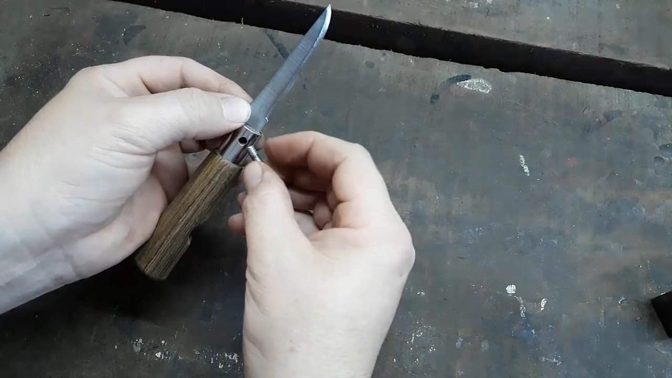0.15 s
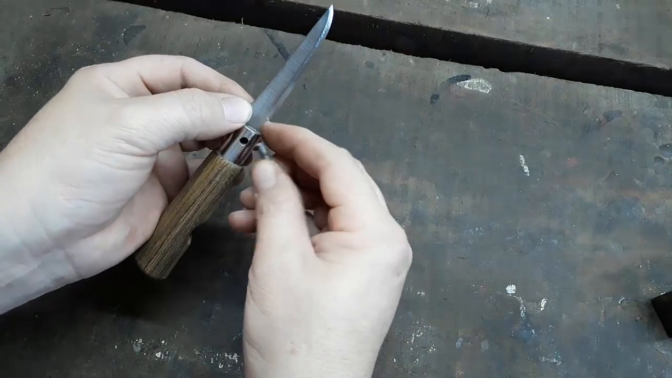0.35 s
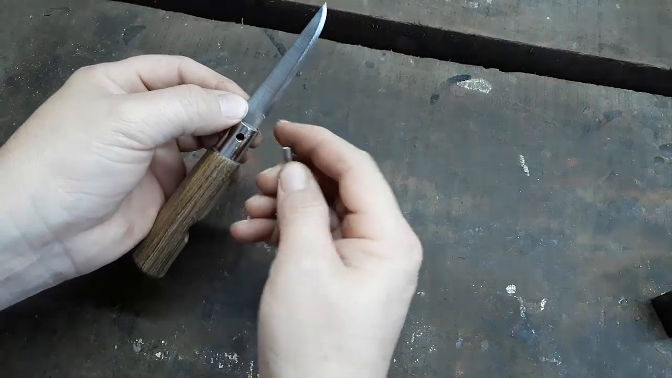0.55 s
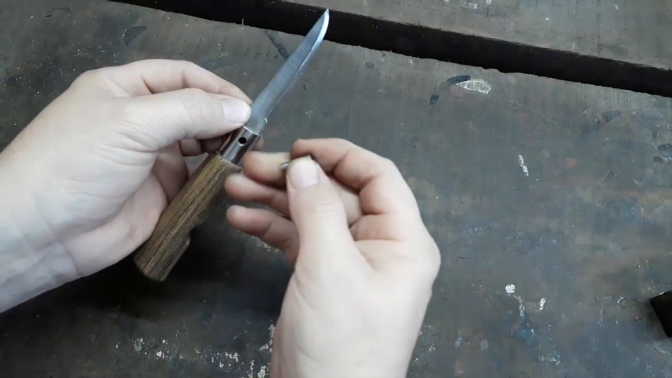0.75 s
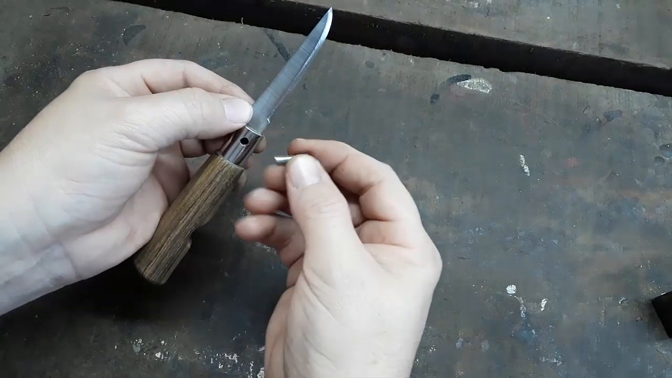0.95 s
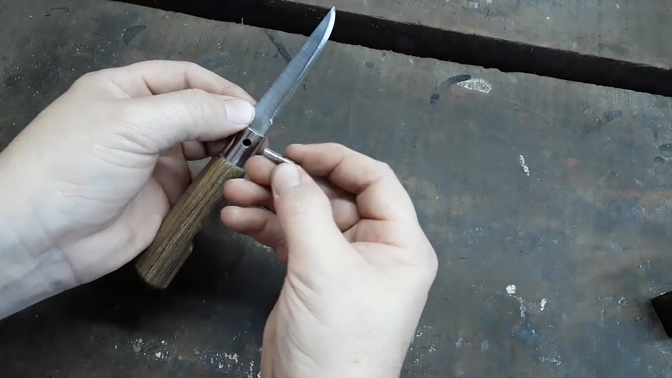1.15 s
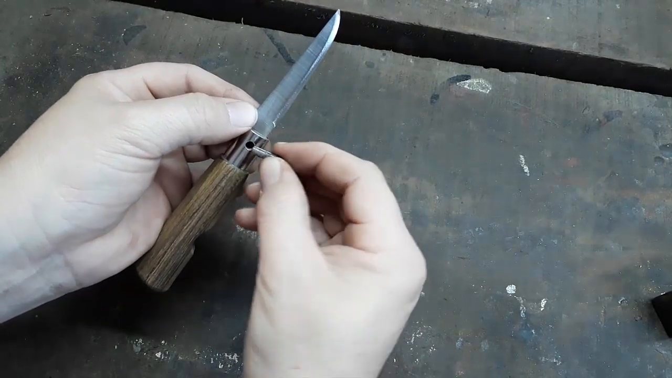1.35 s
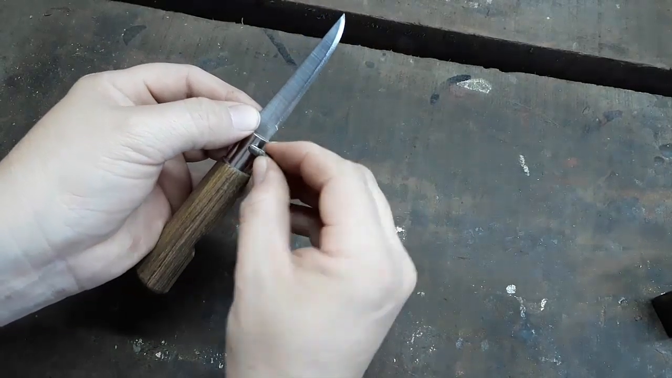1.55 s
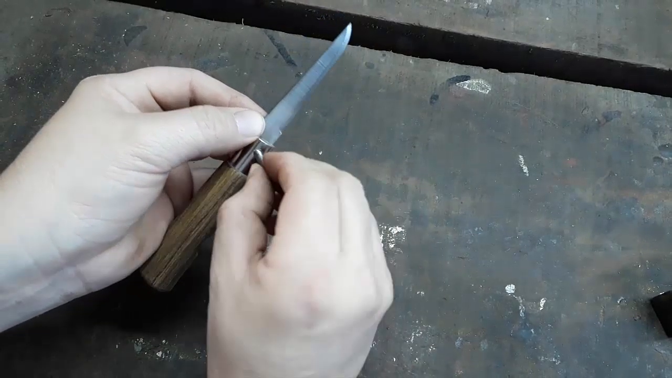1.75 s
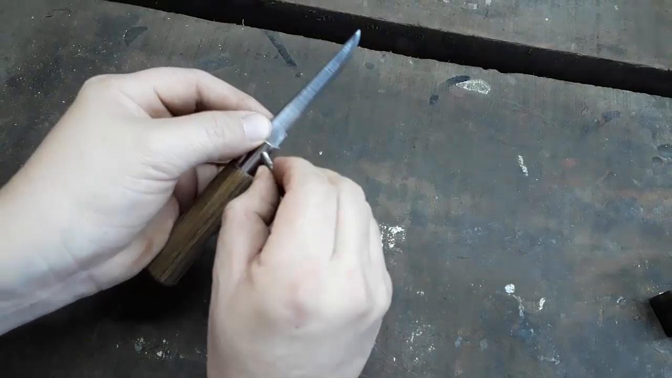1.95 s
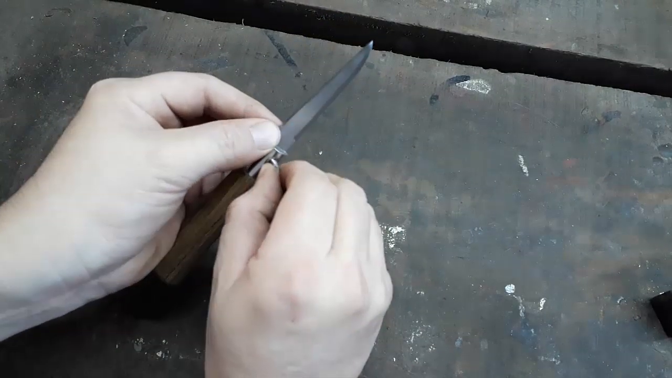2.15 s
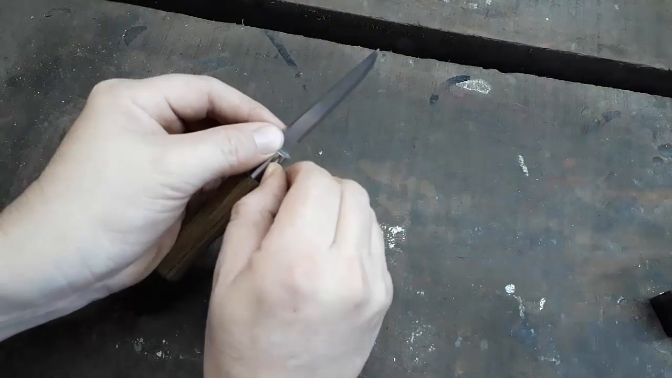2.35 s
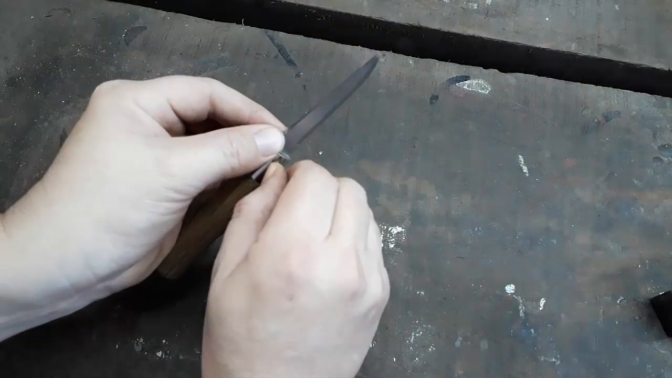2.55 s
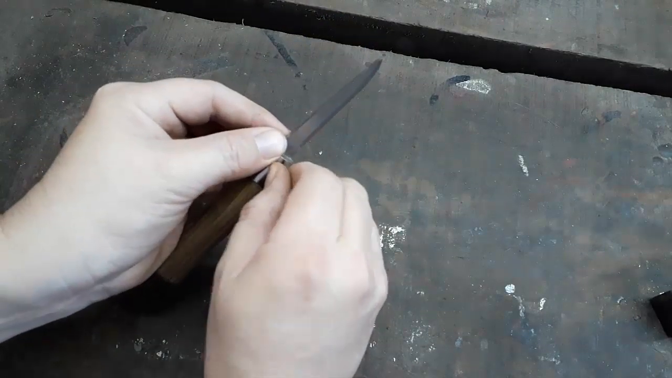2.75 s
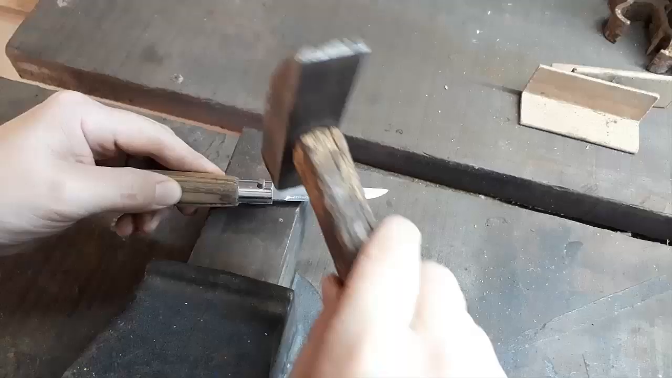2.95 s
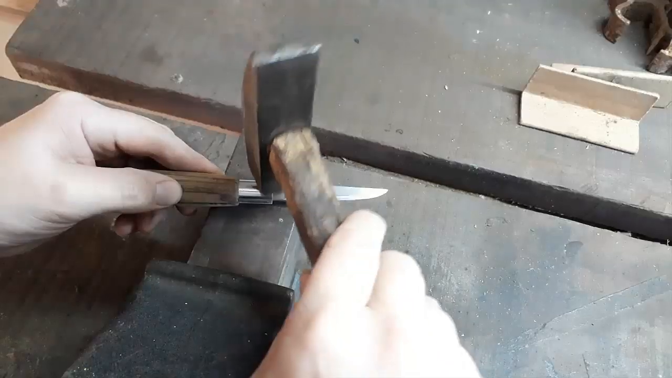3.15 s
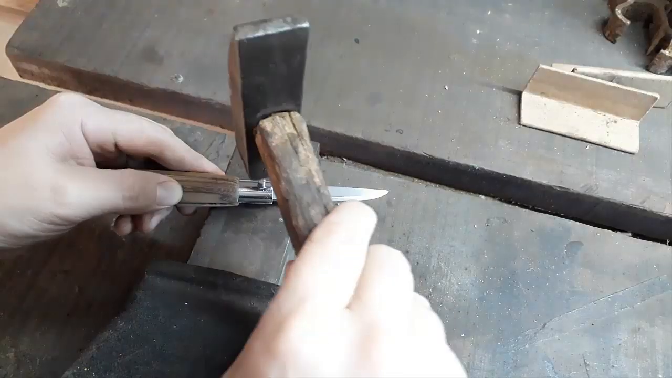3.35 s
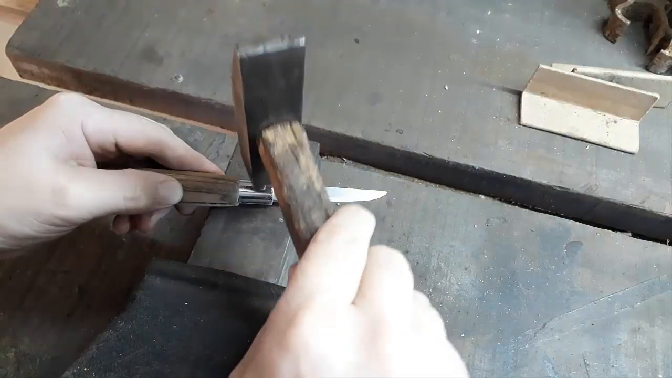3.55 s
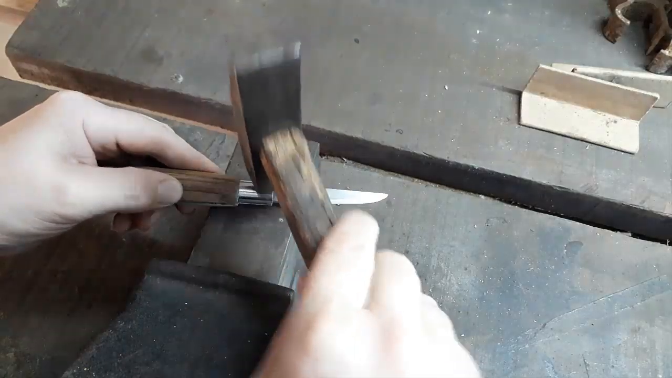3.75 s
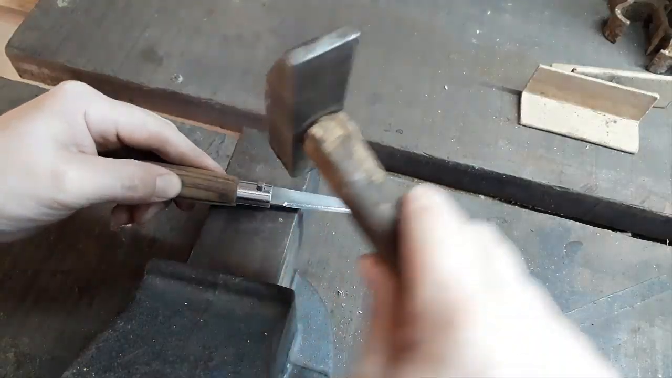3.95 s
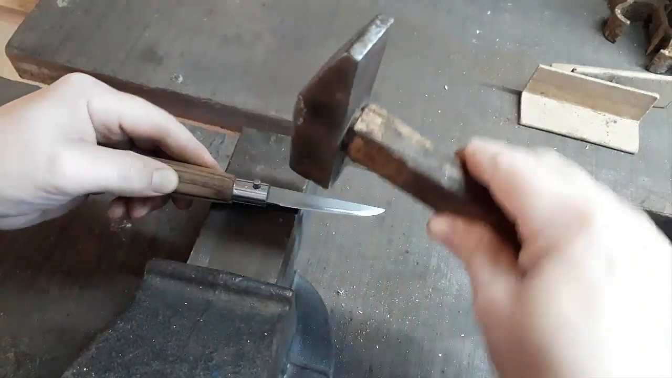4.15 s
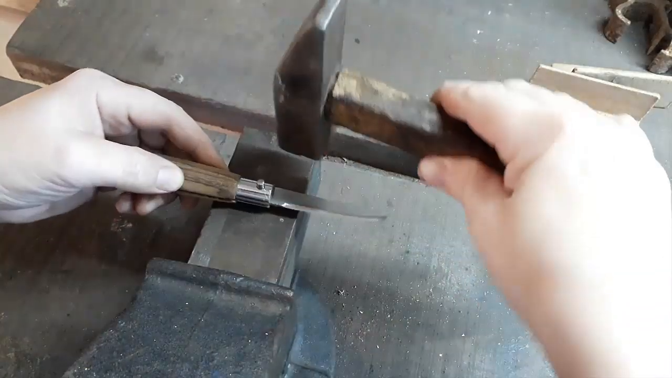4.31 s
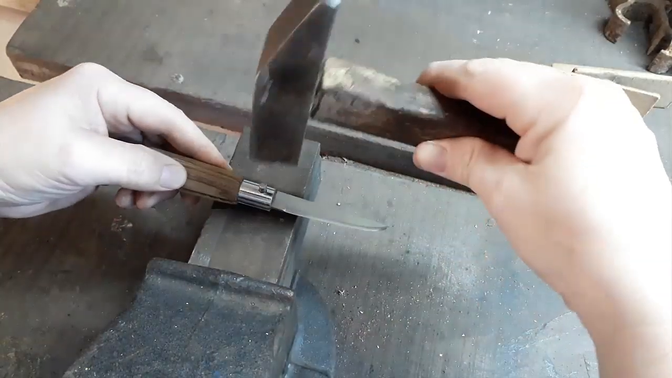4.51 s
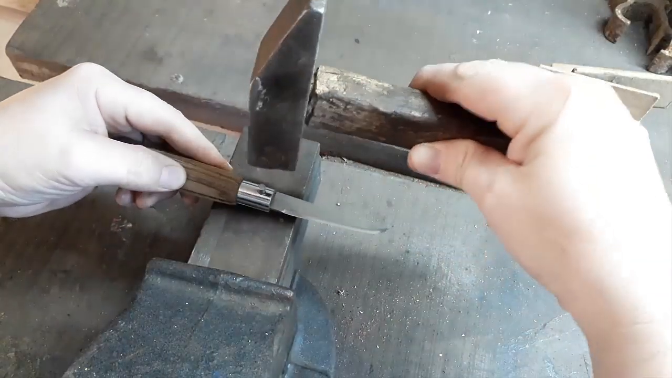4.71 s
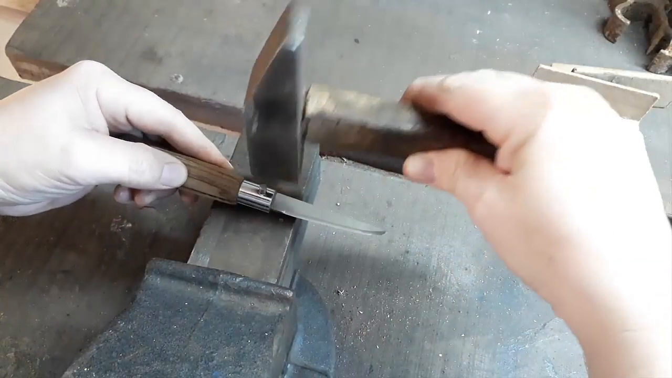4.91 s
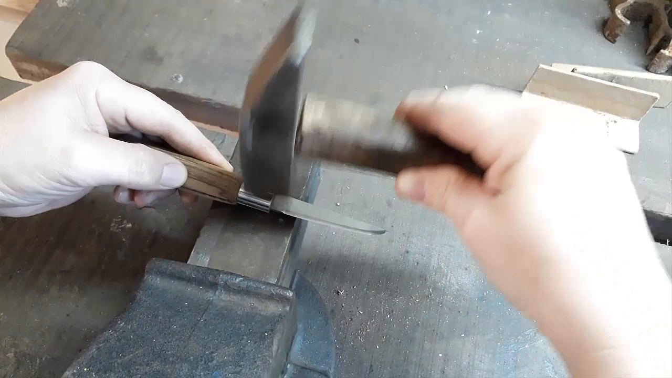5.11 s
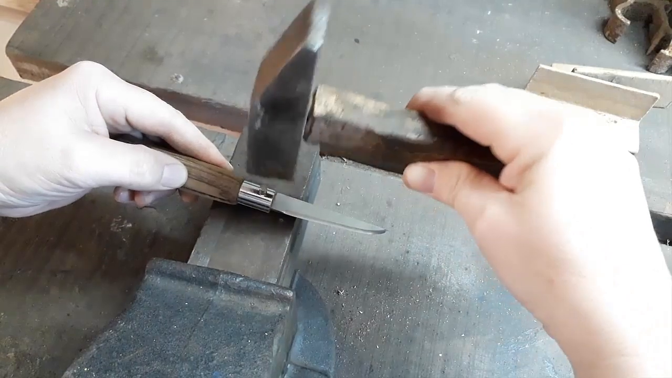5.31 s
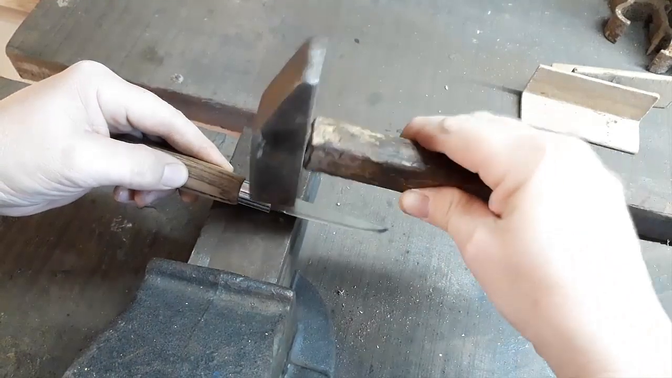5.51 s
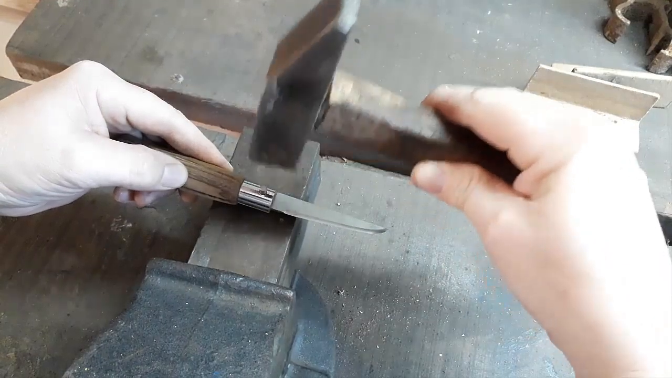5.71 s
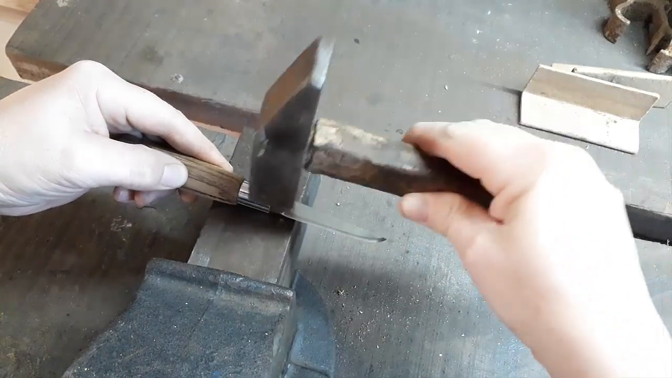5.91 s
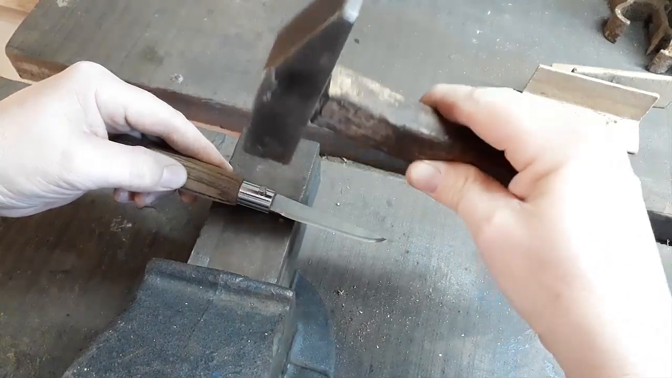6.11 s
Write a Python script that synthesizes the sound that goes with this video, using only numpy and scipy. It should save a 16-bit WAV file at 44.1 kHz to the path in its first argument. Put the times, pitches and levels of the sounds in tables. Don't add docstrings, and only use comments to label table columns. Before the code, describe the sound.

Close view of a workbench in a quiet room with faint low air noise and hiss. Faint distant birds chirp while a small pin clicks against a metal collar, the last click clearest. Then a steel hammer strikes the pin on a vise: one lighter tap, two firmer ones, a short gap with a soft rustle, and four evenly spaced hard blows. Each cracks brightly, with a short metallic ring, a woody bench knock and room reverberation.

```python
import sys
import numpy as np
from scipy import signal
from scipy.fft import rfft, irfft, next_fast_len
from scipy.io import wavfile
from scipy.ndimage import uniform_filter1d, map_coordinates

SR = 44100
rng = np.random.default_rng(int(sys.argv[2]) if len(sys.argv) > 2 else 0)


def generate_wav(signal):
    frames = np.transpose(np.atleast_2d(signal))
    scaled = np.clip(frames, -1, 1) * 32767
    pcm = np.round(scaled).astype(np.int16)
    wavfile.write(sys.argv[1], SR, pcm)


def gain_from_db(level_db):
    decades = np.asarray(level_db, float) / 20
    return 10 ** decades


N = 276507


def unit(x):
    return x / np.sqrt(np.mean(x ** 2) + 1e-20)


def along(points, hz):
    f, v = np.transpose(points)
    return np.interp(np.log(hz + 1), np.log(f + 1), v)


def coloured(n, gain):
    m = next_fast_len(n + 4096)
    spectrum = rfft(rng.standard_normal(m)) * gain(np.fft.rfftfreq(m, 1 / SR))
    return unit(irfft(spectrum, m)[:n])


def fade(t, t60, attack):
    return gain_from_db(-60 * t / t60) * (1 - np.exp(-t / attack))


def ring(modes, t, attack, scatter_db, rough):
    hz, db, t60 = np.transpose(modes)[:, :, None]
    drift = rough * np.cumsum(rng.standard_normal((len(modes), len(t))), axis=1) / np.sqrt(SR)
    sign = (-1.0) ** np.arange(len(modes))[:, None]
    size = sign * gain_from_db(db + scatter_db * rng.standard_normal(hz.shape))
    return np.sum(size * fade(t, t60, attack) * np.sin(2 * np.pi * hz * t + drift), axis=0)


def wash(t60s, t, gain, attack):
    hz, s, z = signal.stft(coloured(len(t), gain), SR, nperseg=128)
    decay = gain_from_db(-60 * s / along(t60s, hz)[:, None])
    x = signal.istft(z * decay, SR, nperseg=128)[1][:len(t)]
    return x * (1 - np.exp(-t / attack))


def tail(t60s, t):
    x = wash(t60s, t, np.ones_like, 0.001)
    return x / np.linalg.norm(x)


# frequency in Hz, t60 in seconds.
WALLS = [(60, 0.35), (160, 0.56), (420, 0.2), (1100, 0.31), (2900, 0.27), (7700, 0.22), (15000, 0.22)]
# frequency in Hz, t60 in seconds.
HALL = [(100, 3.6), (700, 0.36), (2000, 1.6), (3500, .7), (7000, .5), (12000, 0.44)]


def in_room(x, t, room_db, hall_db):
    answer = gain_from_db(room_db) * tail(WALLS, t) + gain_from_db(hall_db) * tail(HALL, t)
    return x + signal.fftconvolve(x, answer)[:len(t)]


def lumps(spacing_hz, depth_db):
    knots = np.clip(rng.standard_normal(2400), -2, 1.6)
    return lambda hz: gain_from_db(depth_db * map_coordinates(knots, [hz / spacing_hz]))


def patchy(x, depth_db):
    z = signal.stft(x, nperseg=1024)[2]
    field = uniform_filter1d(rng.standard_normal(z.shape), size=3, axis=0)
    field = uniform_filter1d(field, size=5, axis=1)
    return unit(signal.istft(z * gain_from_db(depth_db * unit(field)), nperseg=1024)[1][:N])


def add(track, s, x):
    track[round(s * SR):][:len(x)] += x


# frequency in Hz, level in dB per Hz.
RUMBLE = [(15, -56.5), (25, -22.5), (37, -15), (70, -4), (167, -1), (203, -9), (404, -12), (450, -13.5),
          (580, -48.5), (990, -120)]
# frequency in Hz, level in dB per Hz.
HISS = [(210, -31.5), (350, -18.5), (403, -6), (451, -5), (834, -3.5), (1920, -10.5), (2080, -10.5),
        (3620, -11.5), (5990, -20.5), (15200, -26.5)]
# time in seconds, rumble level in dB.
AIR_LEVEL = [(0.0, -66.5), (0.98, -67), (3.07, -66), (3.35, -70.5), (3.77, -65.5), (4.45, -62),
             (4.961, -69.5), (5.411, -56.5), (5.809, -68), (6.27, -62.5)]


def air():
    time = np.arange(N) / SR
    s, rumble_db = np.transpose(AIR_LEVEL)
    hiss_db = -74.5 + 0.81 * (rumble_db - rumble_db.mean())
    gusts = map_coordinates(rng.standard_normal(80), [time * 12])
    rumble = coloured(N, lambda hz: gain_from_db(along(RUMBLE, hz)))
    rumble = rumble * gain_from_db(np.interp(time, s, rumble_db) - 4.5 + 0.47 * gusts)
    hiss = coloured(N, lambda hz: gain_from_db(along(HISS, hz)) * (hz < SR * .347))
    hiss = patchy(hiss, depth_db=2.5) * gain_from_db(np.interp(time, s, hiss_db) + 2.0)
    return rumble + hiss


# start in seconds, length
# in seconds, first pitch in Hz, last pitch in Hz,
BIRDS = [(0.034, 0.085, 2060, 2030, -78), (0.097, 0.064, 4540, 2850, -74.5),
         (0.651, 0.046, 1970, 2050, -73), (0.715, 0.045, 2030, 2040, -79), (0.8, 0.087, 2050, 2040, -77),
         (0.842, 0.075, 3140, 2920, -70), (0.925, 0.042, 4180, 3540, -63), (2.07, 0.15, 4010, 3750, -76),
         (0.955, 0.036, 3500, 3030, -72), (0.928, .06, 2060, 1750, -75), (4.015, .05, 5300, 5300, -72),
         (4.572, 0.13, 2000, 2045, -77), (4.715, 0.054, 4680, 4800, -76.5)]


def birds():
    out = np.zeros(N + SR)
    for s, length, from_hz, to_hz, db in BIRDS:
        n = round(length * SR)
        blur = .12 + 0.023 * np.sqrt(abs(to_hz - from_hz))
        drift = blur * 40 * np.cumsum(rng.standard_normal(SR // 4))[:n] / np.sqrt(SR)
        phase = 2 * np.pi * np.cumsum(np.linspace(from_hz, to_hz, n)) / SR
        add(out, s, gain_from_db(db) * np.sqrt(np.hanning(n)) * np.sin(phase + drift))
    echo = signal.fftconvolve(out, tail(WALLS, np.arange(SR // 3) / SR))
    return out[:N] + gain_from_db(-2.0) * echo[:N]


# frequency in Hz, level in dB per Hz.
TOUCH = [(180, -34), (300, -21.5), (1960, -21.5), (3650, -7.5), (4690, -8.5), (7020, -6.5), (8440, -14.5),
         (9020, -15), (10100, -20), (15600, -23), (16050, -52)]


def touch(hz):
    return gain_from_db(along(TOUCH, hz))


def rustle():
    times = 3.9 + np.cumsum([0, 0.068, 0.103, .05])
    swell = np.interp(np.arange(N) / SR, times, [0, 1, 1, 0])
    return coloured(N, touch) * gain_from_db(-68.5) * swell


# start in seconds, peak
# level in dB, centre frequency in Hz,
CLICKS = [(0.778, -57.5, 6940, -12), (1.6003, -49, 4500, -5.5), (1.711, -69.5, 4050, -10),
          (1.754, -68, 4300, -12), (1.807, -61, 5300, -10), (1.928, -42.5, 7200, -10),
          (2.068, -34, 7040, -0.5), (2.1338, -46.5, 8250, -19), (2.643, -25, 7300, -11),
          (2.97, -66, 6800, -11), (4.1503, -63, 4290, -7), (4.5, -58.5, 4860, -19.5),
          (4.56, -68, 5370, -10.5), (5.2812, -32, 5160, -14.5), (5.348, -54, 5300, -1),
          (5.381, -59, 9000, -4), (5.421, -62, 9000, -4.5), (5.772, -64, 4500, -10),
          (0.803, -68, 6800, -16), (0.821, -70, 5200, -14)]


def pin():
    out, t = np.zeros(N + SR), np.arange(SR // 3) / SR
    rise = .002
    for s, db, centre_hz, body_db in CLICKS:
        collar_db = -1.5 + 0.98 * body_db - 2.52 * centre_hz / 1e3 - .3 * (db + 45)
        shape = lambda hz: touch(hz) * (gain_from_db(body_db) * 3 + 1 / (1 + ((hz - centre_hz) / 1100) ** 2))
        late = t - 3 * rise
        env = np.where(late < 0, gain_from_db(-13) * np.exp(late / rise), gain_from_db(-60 * late / 0.04))
        add(out, s - 3 * rise, gain_from_db(db - 3.5) * coloured(len(t), shape) * env)
        collar = ring([(3800, 0, .22), (4100, 0, .2)], t, .002, scatter_db=1.5, rough=30)
        walls = gain_from_db(-23.5) * wash(WALLS, t, shape, 0.0023)
        add(out, s, gain_from_db(db) * (walls + gain_from_db(collar_db) * collar))
    return out[:N]


# frequency in Hz, level in dB, t60 in seconds.
LEGS = [(88.2, -8.5, 0.76), (120.6, -8, 0.55), (162.25, 0.5, 0.38), (202, -3.5, 0.46), (246.3, 0.5, .3)]


def legs(t, extra_db):
    return gain_from_db(-19 + 0.66 * extra_db) * ring(LEGS, t, .012, scatter_db=2, rough=8)


# frequency in Hz, level in dB, t60 in seconds.
VISE = [(700, -6, .9), (735, -7, .8), (910, -11, .9), (1437, -10, 1), (1545, -8, .8), (1820, -12, .5),
        (2095, -8, .6), (2200, -12, .5), (2304, -9, .6), (2520, -13, .7), (2650, -11, .6), (1950, -12, .6),
        (2400, -13, .6)]


def vise_body(t, extra_db):
    return gain_from_db(-32.5 + 0.78 * extra_db) * ring(VISE, t, .01, scatter_db=2, rough=9)


# frequency in Hz, level in dB, t60 in seconds.
BENCH = [(327.8, 7, 0.11), (416.3, -4, 0.13), (488, -1, 0.12), (544, -7.5, 0.14), (632, -2.5, 0.14),
         (704.6, 5, 0.096), (767.7, 1.5, 0.11), (1087, -12, 0.21), (1210, -15, 0.23), (1311, -11, .14)]


def bench_top(t, extra_db, lean_db):
    modes = [(hz, db + lean_db * (hz < 450), t60) for hz, db, t60 in BENCH]
    bench = gain_from_db(-8.5 - 0.3 * extra_db) * ring(modes, t, .007, scatter_db=1.2, rough=8)
    return in_room(bench, t, -11.5, -37.5)


def push(t, lean_db):
    u = t / .0014
    shove = gain_from_db(-2 + lean_db / 2) * u ** 2 * (1 - 2 * u / 3) * np.exp(2 - 2 * u)
    return signal.sosfilt(signal.butter(3, 190, "highpass", fs=SR, output="sos"), shove)


# frequency in Hz, level in dB, t60 in seconds.
JAWS = [(3460, -10, 0.094), (4770, -6.5, 0.089), (4690, 6, 0.035), (5090, -6, 0.055), (5100, -10, 0.22),
        (6060, -5, 0.068), (5850, -4.5, 0.25), (6200, -11.5, 0.067), (7300, -13.5, 0.21)]


def jaws(t):
    return gain_from_db(-18) * ring(JAWS, t, .0015, scatter_db=3, rough=10)


def blade(t, knife_hz):
    hz = .88 * knife_hz
    return gain_from_db(-14.5) * ring([(hz, 0, .12), (hz * 1.03, -5, .15)], t, .001, scatter_db=1, rough=12)


# frequency in Hz, level in dB, t60 in seconds.
HEAD = [(9340, 4.5, .13), (11340, -10, .14), (13245, -11, .08), (15195, -2, .085)]


def hammer_head(t, head_db):
    rebound = gain_from_db(-9 / (1 + np.exp((.027 - t) / .002)))
    return gain_from_db(head_db - 14) * rebound * ring(HEAD, t, .0015, scatter_db=1, rough=4)


# frequency in Hz, level in dB per Hz.
CRACK = [(530, -37.5), (900, -3.5), (1250, -2.5), (1760, -8), (3560, -9), (4100, -6.5), (4950, 2),
         (6390, -2), (9090, -7), (10800, -17), (15750, -18), (16050, -55.5)]


def crack(t, knife_hz, vise):
    knife_db = 2 * (knife_hz - 5900) / 1e3
    seat = lumps(spacing_hz=260, depth_db=1.4)

    def colour(hz):
        peak_db = knife_db / (1 + ((hz - knife_hz) / 900) ** 2)
        return seat(hz) * vise(hz) * gain_from_db(along(CRACK, hz) + peak_db)

    env = gain_from_db(-4.5) * (fade(t, 0.0052, 0.00038) + fade(t, 0.069, 0.00033))
    rattle = coloured(len(t), colour) * env
    near = gain_from_db(-12.5) * wash(WALLS, t, colour, 0.0088)
    return rattle + near + gain_from_db(-34.0) * wash(HALL, t, colour, 0.078)


def snap(centre_hz):
    t, rise = np.arange(SR // 200) / SR, .0002
    phase = 2 * np.pi * centre_hz * (t - rise)
    cycle = np.cos(phase) + 0.12 * np.cos(1.9 * phase)
    return (t / rise) ** 2 * np.exp(2 - 2 * t / rise) * cycle / 1.3


# start in seconds, peak level in dB.
BOUNCES = [(3.2304, -12), (3.2329, -19), (3.2345, -21), (3.4883, -11), (3.4889, -12), (3.4905, -10),
           (3.4909, -13), (3.8136, -4), (3.8175, -12), (4.9169, -3.5), (4.9189, -16), (5.2027, -4.5),
           (5.2035, -11), (5.5741, -8), (5.5746, -12), (5.5771, -13), (5.578, -8), (5.9454, -5),
           (5.9461, -11), (5.9493, -8), (5.9505, -16)]


def bounces():
    out = np.zeros(N + SR)
    for s, db in BOUNCES:
        add(out, s, -gain_from_db(db) * snap(6900))
    return out[:N]


# start in seconds, effort in dB, hammer head level in dB, knife resonance in Hz,
# lean of the bench to its low modes in dB.
BLOWS = [
    (3.2301, -28, -7, 7100, -1.5),
    (3.4879, -18, -28.5, 5900, -3),
    (3.8134, -17.5, -11, 5380, -8.5),
    (4.9163, -22, 0, 5900, -1.5),
    (5.2028, -16, 4.5, 6200, -4),
    (5.5735, -15.5, -3.5, 6200, 3),
    (5.9452, -16.5, -14, 6080, 0.5),
]


def hammer():
    out, t = np.zeros(N + SR), np.arange(SR * 3 // 4) / SR
    vise = lumps(spacing_hz=22, depth_db=2.7)
    for s, db, head_db, knife_hz, lean_db in BLOWS:
        extra_db = db + 18
        steel = crack(t, knife_hz, vise) + jaws(t) + blade(t, knife_hz) + hammer_head(t, head_db)
        support = bench_top(t, extra_db, lean_db) + legs(t, extra_db) + vise_body(t, extra_db)
        add(out, s, gain_from_db(db) * (steel + push(t, lean_db) + support))
    return out[:N]


def scene():
    return (air() + birds() + rustle() + pin() + bounces() + hammer())[None]


def low_pass(x):
    return signal.sosfilt(signal.butter(12, 17060, fs=SR, output="sos"), x)


def record(dry):
    heard = signal.sosfilt(signal.butter(2, 40, "highpass", fs=SR, output="sos"), dry)
    heard = signal.sosfilt(signal.cheby2(8, 40, 17300, fs=SR, output="sos"), heard)
    return low_pass(heard)


dry = scene()
out = record(dry)
generate_wav(out)
```